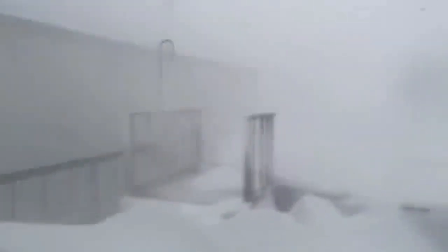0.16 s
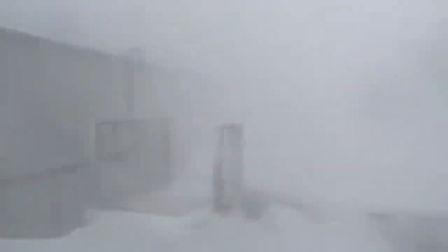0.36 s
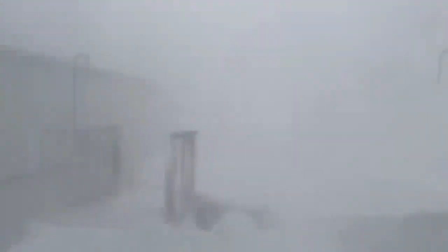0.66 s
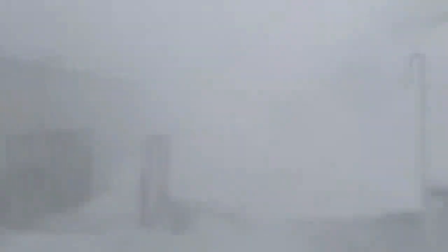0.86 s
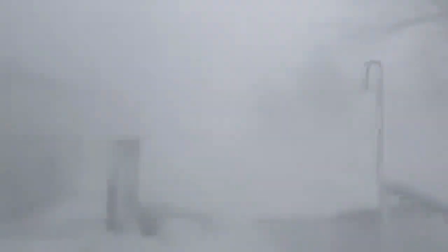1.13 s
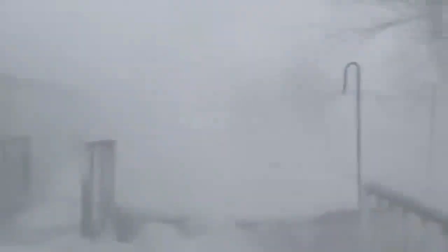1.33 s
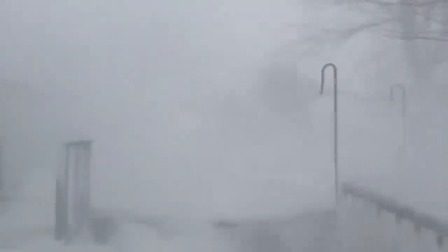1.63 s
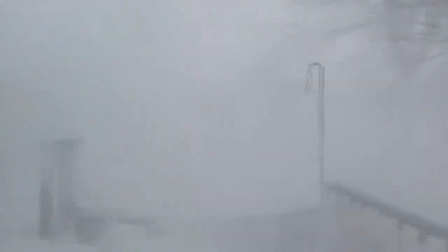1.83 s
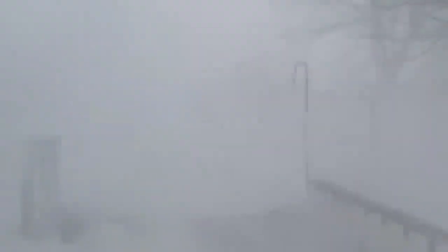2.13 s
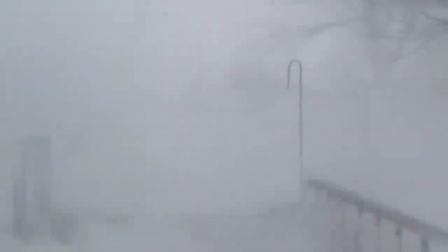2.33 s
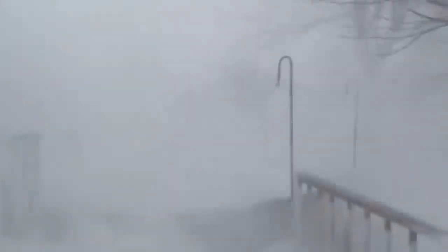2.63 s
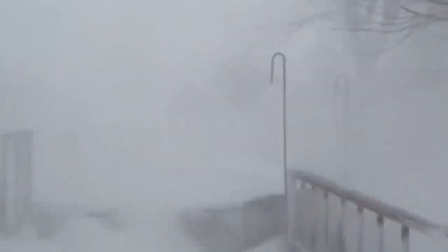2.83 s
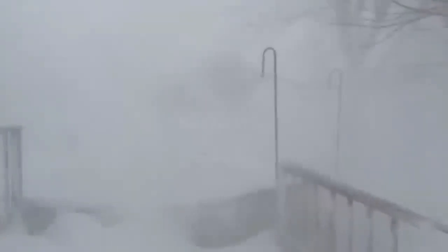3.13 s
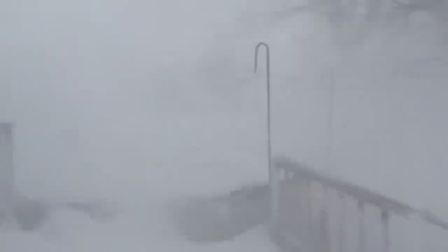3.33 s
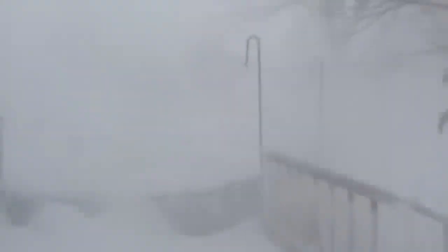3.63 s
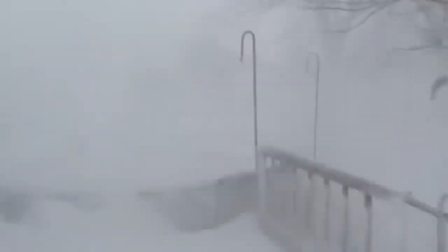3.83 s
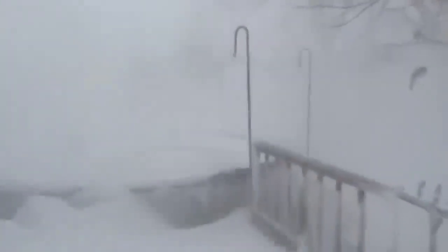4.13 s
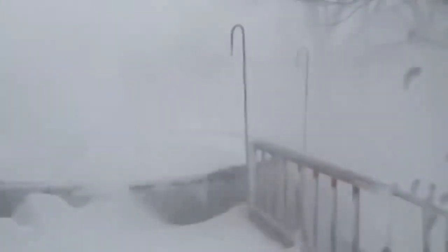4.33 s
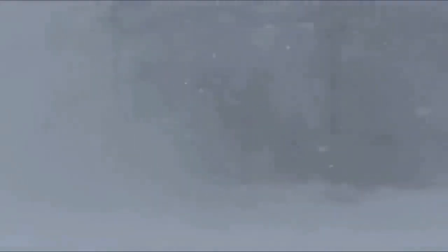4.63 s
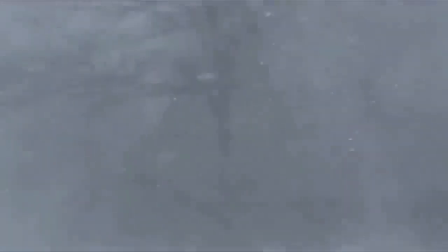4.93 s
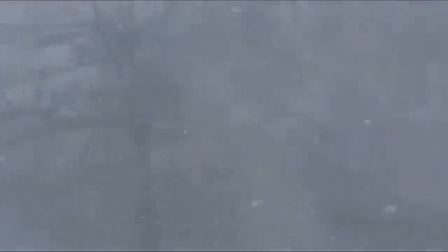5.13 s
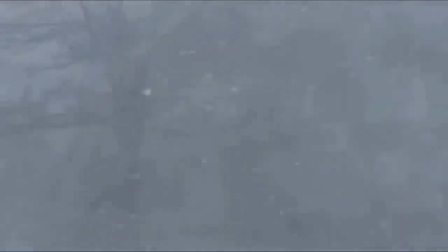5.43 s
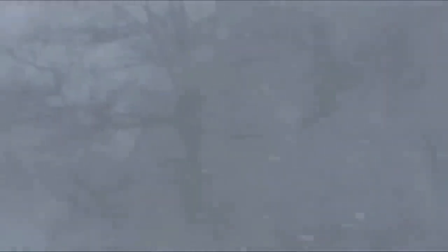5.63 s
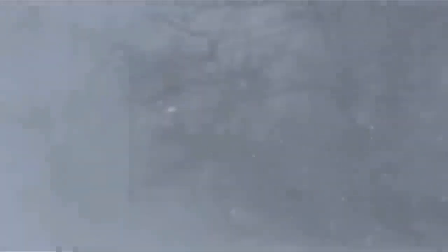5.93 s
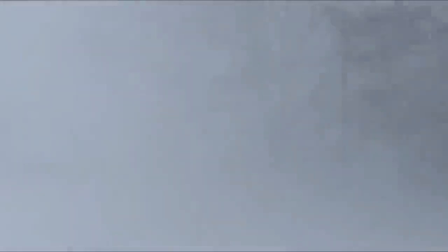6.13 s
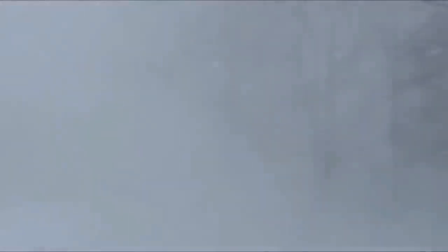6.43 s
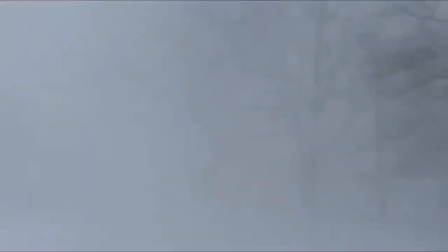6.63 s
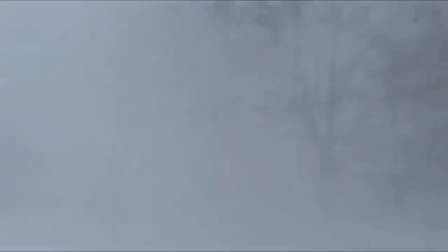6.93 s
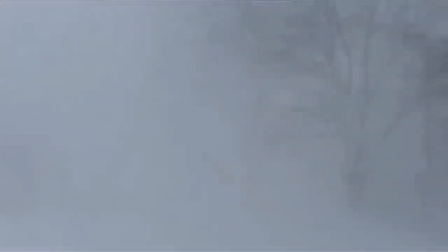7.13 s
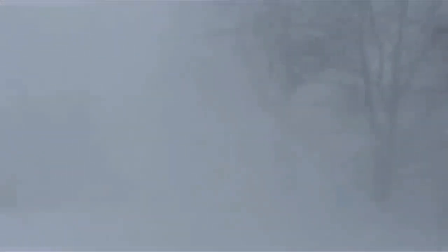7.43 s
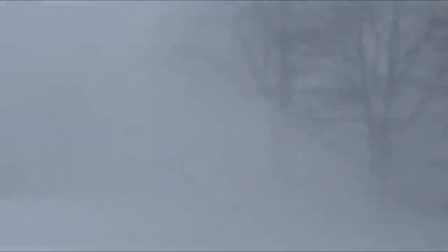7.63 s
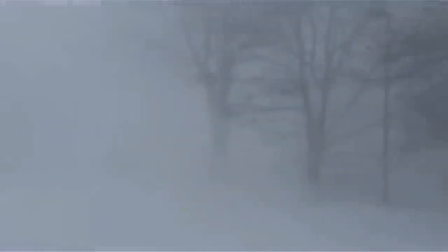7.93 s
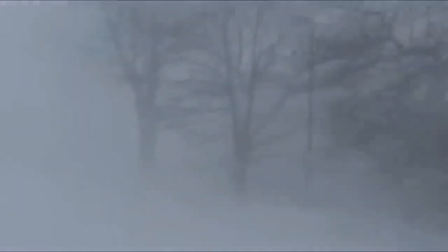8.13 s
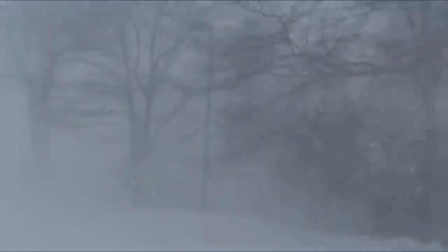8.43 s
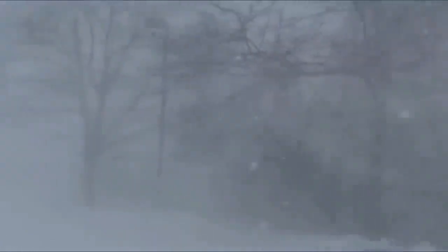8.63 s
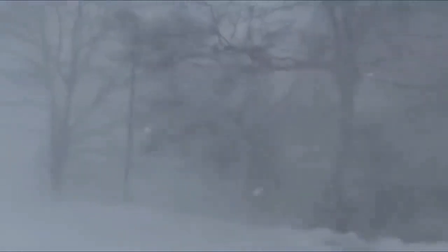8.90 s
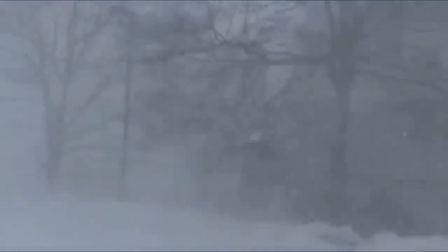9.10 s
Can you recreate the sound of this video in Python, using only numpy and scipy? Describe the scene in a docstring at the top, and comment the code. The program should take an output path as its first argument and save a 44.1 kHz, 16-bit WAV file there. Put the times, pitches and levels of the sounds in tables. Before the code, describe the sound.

Blizzard wind roars softly with light flicks on the microphone, then jumps abruptly to loud, howling gusts that buffet, slap and overload it.

```python
"""Blizzard wind over open snow, at the two microphone ports of a small handheld camera.
All round, shaped noise makes a low drone, the roar in the trees and the hiss of driven snow.
Close in, breeze and stray gusts flick the ports: noise puffs rumble, flutter, slap and rasp.
A fuzzy tone whistles once and three ticks sound on the camera body. From 4.45 s the storm is much
louder, broad bands of noise howl, and gusts buffet the ports until the recorder overloads."""
import sys
import numpy as np
from scipy import signal
from scipy.fft import rfft, irfft
from scipy.io import wavfile
from scipy.ndimage import uniform_filter1d

SR = 44100
rng = np.random.default_rng(int(sys.argv[2]) if len(sys.argv) > 2 else 0)


def materialize(psi):
    """Save the field psi as 16-bit PCM at rate SR to the path in sys.argv[1].

    A 1-D psi becomes a single channel; in a 2-D psi each row is a channel.
    """
    bounded = np.clip(np.atleast_2d(psi).T, -1, 1)
    quanta = np.round(bounded * 32767).astype(np.int16)
    wavfile.write(sys.argv[1], SR, quanta)


N = 408366

HARD_WIND_FROM_S = 4.45
TIME = np.arange(N) / SR
HZ = np.fft.rfftfreq(N, 1 / SR)
# frames of 512 samples, one every 128
FRAME_S = np.arange(N // 128 + 5) * 128 / SR
FRAME_HZ = np.fft.rfftfreq(512, 1 / SR)


def gain_of(db):
    """Decibels to amplitude."""
    return 10 ** (np.asarray(db) / 20)


def evened(x):
    """Scales to rms 1."""
    return x / np.sqrt(np.mean(x ** 2) + 1e-20)


def read(points, hz=HZ):
    """A table over frequency, joined on a log axis."""
    f, value = np.transpose(points)
    return np.interp(np.log(hz + 1), np.log(f + 1), value)


def follow(rows):
    """The columns of a table over time, at every sample."""
    s, *columns = np.transpose(rows)
    return [np.interp(TIME, s, column) for column in columns]


def wander(rate_hz):
    """Smooth chance of rms 1, with changes up to about the given rate."""
    return evened(irfft(rfft(rng.standard_normal(N)) / (1 + (HZ / rate_hz) ** 4), N))


def air(spectrum, alike):
    """Steady noise at left and right: a shared part and a part in opposite phase."""
    shared, opposed = rfft(rng.standard_normal((2, N))) * gain_of(read(spectrum))
    likeness = np.clip(read(alike), -1, 1)
    shared = shared * np.sqrt(1 + likeness)
    opposed = opposed * np.sqrt(1 - likeness)
    return evened(irfft(np.array([shared + opposed, shared - opposed]), N))


def steadied(x, seconds):
    """Keeps the quick churn of a sound but evens its strength over the given time."""
    window = signal.windows.hann(int(max(seconds, .004) * SR))
    power = signal.oaconvolve((x ** 2).mean(0), window / window.sum(), "same")
    return x / np.sqrt(np.abs(power) + 1e-6)


def storm(drone_db=0.0, roar_db=1.5, hiss_db=2.5, lumps_db=3.5, sway_db=1.43, grain_db=1.5):
    """Noise all round: a low drone, the roar in the trees, and the fine grain of driven snow."""
    # the storm before trims: t/s, drone level/dB, roar level/dB, hiss level/dB
    course = [(0, -52, -47.5, -55.5), (0.15, -39, -41, -60.5), (0.7, -36, -40, -56.5),
              (1.4, -40, -41.5, -57), (2.1, -39, -37.5, -58.5), (2.7, -34, -37.5, -56.5),
              (3.4, -35.5, -37.5, -56.5), (4.0, -35.5, -37.5, -56.5), (4.44, -32.5, -37.5, -59.5),
              (4.46, -35, -45, -39), (4.7, -20, -59, -40.5), (5.3, -45, -33, -41), (5.9, -32, -48, -41.5),
              (6.4, -35, -30.5, -43), (7.0, -31, -28.5, -46.5), (7.5, -35, -37, -49.5),
              (8.25, -39, -36.5, -49.5), (8.6, -27, -36.5, -50.5), (9.26, -32, -37, -47.5)]
    # spectra of the drone, the roar and the hiss: f/Hz, relative level/dB
    drone_spectrum = [(15, -19), (30, -58), (48, -7.5), (65, 5.5), (90, -8.5), (140, -4), (200, -12),
                      (400, -28.5), (900, -66), (3000, -82)]
    roar_spectrum = [(40, 12), (150, 7), (330, 4.5), (600, 2), (1000, -2), (1600, -10.5), (2400, -16.5),
                     (3600, -21.5), (5000, -26.5), (9000, -44.5)]
    hiss_spectrum = [(500, 9.5), (2500, 8), (4200, 2), (4900, 1), (5800, 1.5), (8500, 0.5), (10700, -3.5),
                     (11800, -21.5), (15000, -42)]
    # likeness of left and right: f/Hz, likeness/-1 to 1
    storm_alike = [(100, 1), (240, 1), (500, 0.64), (900, 0.028), (1300, 0.21), (2000, 0.97), (2800, 0.18),
                   (3900, 0.84), (4900, 0.083), (6500, 0.73), (10900, 0.063)]
    drone_level, roar_level, hiss_level = follow(course)
    drone = air(drone_spectrum, storm_alike) * gain_of(drone_db + drone_level + lumps_db * wander(8.3))
    roar = air(roar_spectrum, storm_alike) * gain_of(roar_db + roar_level + sway_db * wander(31))
    hiss = air(hiss_spectrum, storm_alike) * gain_of(hiss_db + hiss_level + grain_db * wander(540))
    return drone + roar + hiss


def blast(t, length, rise_s, fall_s):
    """Amplitude of a rush of air: a quick rise up to t = 0, a hold, a fall."""
    rise = -.5 * (np.minimum(t, 0) / rise_s) ** 2
    fall = np.maximum(t - length, 0) / fall_s
    return np.exp(rise - fall)


def wind(rise_s=0.011, fall_s=0.008):
    """Breeze and gusts add in power at the microphone: rumble dB, flutter dB and stereo width."""
    # the unsteady breeze between gusts: t/s, rumble level/dB, flutter level/dB, stereo width/0-1
    breeze = [(0, -61, -45, 1), (.15, -45, -45, 1), (.45, -40, -62, 0), (1.05, -27.5, -40, 0.54),
              (1.35, -26.5, -35.5, 0.15), (1.7, -27, -42, 0.55), (2.2, -32, -39, 0.4),
              (2.4, -67, -48, 0.06), (4.44, -80, -49.5, 0), (4.47, -20.5, -26, 0), (5.3, -25.5, -38, 0.3),
              (5.95, -25, -29.5, 1), (6.35, -30, -35, 0), (7.55, -30, -28.5, 0), (8.3, -26.5, -28.5, 0),
              (9.26, -14, -30, 1)]
    # gusts that strike the microphone:
    # start t/s, length/s, rumble level/dB, flutter level/dB, stereo width/0-1
    gusts = [(0.13, 0.055, -35.5, -43, 0.86), (0.34, 0.073, -28, -33, 0.16),
             (0.518, 0.079, -15.5, -24, 0.44), (0.898, 0.0083, -29, -48, 0.4),
             (1.139, 0.1, -17.5, -22, 0.7), (1.543, 0.048, -12.5, -23.5, 1),
             (1.737, 0.065, -16.5, -50, 0.3), (1.905, 0.037, -13.5, -36, 0), (1.964, 0.023, -16, -34, 0),
             (2.088, 0.036, -19.5, -42, 0.4), (4.53, 0.19, -23, -21, 0), (4.718, 0.2, -14, -19, 0),
             (4.967, 0.088, -12.5, -19, 0), (5.096, 0.056, -12.5, -19, 0), (5.162, 0.073, -9, -13.5, 0),
             (5.26, 0.023, -11.5, -20, 0.05), (5.382, 0.017, -18, -16.5, 0.1), (5.438, 0.13, -9, -16, 0.02),
             (5.58, 0.099, -13, -18.5, 0.9), (5.715, 0.033, -16, -21, 1), (5.794, 0.052, -9.5, -26, 1),
             (6.017, 0.077, -21, -18.5, 0.24), (6.107, 0.034, -11, -15.5, 0.83),
             (6.187, 0.046, -16.5, -22.5, 0.96), (6.444, 0.05, -22.5, -30.5, 0), (6.586, 0.024, -6, -13, 0),
             (6.655, 0.042, -7, -13, 0), (6.751, 0.081, -6.5, -10.5, 0.03), (6.835, 0.14, -3, -12.5, 0),
             (6.995, 0.032, -14, -16.5, 0), (7.045, 0.029, -1.5, -10.5, 0.02),
             (7.106, 0.015, -1, -19, 0.02), (7.164, 0.044, -11, -13, 0), (7.238, 0.041, -4, -13.5, 0),
             (7.31, 0.045, -10.5, -23.5, 0), (7.394, 0.054, -20, -17, 0.07), (7.603, 0.04, -18.5, -20.5, 0),
             (7.677, 0.069, -13, -17, 0), (7.766, 0.043, -18.5, -16, 0.02), (7.869, 0.059, -3, -13.5, 0),
             (7.963, 0.074, -12, -20.5, 0.03), (8.093, 0.069, -17.5, -23, 0.08),
             (8.35, 0.041, -15.5, -27, 0.04), (8.444, 0.071, -23, -22, 0.4), (8.63, 0.11, -20, -20.5, 0.2),
             (8.773, 0.19, -13, -17, 1), (9.005, 0.1, -11, -13, 1), (9.086, 0.16, -10.5, -12.5, 0.78)]
    rumble_db, flutter_db, width = follow(breeze)
    push, stir = gain_of(rumble_db) ** 2, gain_of(flutter_db) ** 2
    wide_stir = stir * width
    for start, length, push_db, stir_db, gust_width in gusts:
        power = blast(TIME - start, length, rise_s, fall_s) ** 2
        gust_stir = power * gain_of(stir_db) ** 2
        push = push + power * gain_of(push_db) ** 2
        stir = stir + gust_stir
        wide_stir = wide_stir + gust_stir * gust_width
    return 10 * np.log10(push), 10 * np.log10(stir), wide_stir / stir


def rumble(db, level_db=0., hold_s=0.064, lumps_db=3.0):
    """Deep thumps of wind: the recorder folds them to mono in hard wind, less so in light wind."""
    # spectrum of the rumble: f/Hz, relative level/dB
    rumble_spectrum = [(12, -34), (25, -58), (45, 1), (78, 2.5), (120, -3.5), (190, -5.5), (270, -12.5),
                       (450, -26), (1200, -59), (4000, -100)]
    light = air(rumble_spectrum, [(60, 1.0), (130, 0.87), (300, 0.14)])
    hard = air(rumble_spectrum, [(60, 1), (300, 1)])
    push = np.where(TIME < HARD_WIND_FROM_S, light, hard)
    return steadied(push * gain_of(lumps_db * wander(28.4)), hold_s) * gain_of(level_db + db)


def edge_of(db, edge_hz=990, at_db=-23.5, db_per_octave=15):
    """Faster air is louder and brighter: the upper edge of the flutter in Hz at a given level."""
    return edge_hz * 2 ** ((db - at_db) / db_per_octave)


def eddy_colour(hz, edge_hz, steepness=2.98):
    """Spectrum of small eddies, which die out above the given edge."""
    # spectrum of the flutter: f/Hz, relative level/dB
    flutter_spectrum = [(60, -14), (170, -4.5), (260, 3), (450, 0.5), (800, -8), (1600, -19.5),
                        (3200, -25.5), (5000, -28.5), (7000, -21.5), (15000, -30)]
    colour = gain_of(read(flutter_spectrum, hz)) / np.sqrt(1 + (hz / edge_hz) ** (2 * steepness))
    return colour / np.linalg.norm(colour, axis=0)


def left_right(shared, opposed, s, hz, width, opposed_db=0.5):
    """Left and right spectra at time s: stereo width sets the share in opposite phase."""
    # share in opposite phase at left and right at full stereo width, light wind: f/Hz, share/0-1
    light_wind_opposed = [(60, .03), (130, 0.3), (220, 0.5), (450, 1), (800, 1), (1400, 0.67), (2000, 0.2),
                          (6000, 0.8)]
    # the same share once the wind blows hard: f/Hz, share/0-1
    hard_wind_opposed = [(300, 0.002), (420, 0.01), (530, 0), (680, 1), (1200, 1), (2000, 0.87), (2800, 1),
                         (3800, 0), (5000, 0.7), (7000, 1)]
    most = np.where(s < HARD_WIND_FROM_S, read(light_wind_opposed, hz), read(hard_wind_opposed, hz))
    share = np.clip(most * width, 0, 1)
    shared = shared * np.sqrt(1 - share)
    opposed = opposed * np.sqrt(share) * gain_of(opposed_db)
    return np.array([shared + opposed, shared - opposed])


def at_frames(control):
    """A control read once a frame."""
    return np.interp(FRAME_S, TIME, control)


def port_air(colour, width, patchy_db):
    """Turbulence on the ports: a colour (Hz by frame) broken into short-lived patches."""
    a, b, c, d, patches = rng.standard_normal((len(FRAME_S), len(FRAME_HZ), 5)).T
    patches = uniform_filter1d(patches, size=6, axis=0)
    patches = evened(uniform_filter1d(patches, size=6, axis=1))
    sides = left_right(a + 1j * b, c + 1j * d, FRAME_S, FRAME_HZ[:, None], at_frames(width))
    spectra = colour * gain_of(patchy_db * patches) * sides
    return evened(signal.istft(spectra, nperseg=512, noverlap=384)[1][:, :N])


def flutter(db, width, level_db=0., churn_db=6.0, churn_hz=55, edge_octaves=0.28):
    """Smaller eddies come in bursts: one churn of the flow drives both loudness and brightness."""
    churn = wander(churn_hz)
    edge_hz = at_frames(edge_of(db) * 2 ** (edge_octaves * churn))
    flow = port_air(eddy_colour(FRAME_HZ[:, None], edge_hz), width, patchy_db=0.0)
    churned = steadied(flow, 0.098) * gain_of(churn_db * churn)
    return steadied(churned, 0.037) * gain_of(level_db + db)


def stray_eddies(flutter_db, above_db=-7.0, spread_db=0.0, length_s=0.0033, low_hz=200, count=90):
    """Lesser slaps, one at random in each equal stretch of time, that follow the flutter level."""
    times = (np.arange(count) + rng.random(count)) / count * (N / SR - .2) + .1
    levels = np.interp(times, TIME, flutter_db) + above_db + spread_db * rng.standard_normal(count)
    return [(s, length_s, db, low_hz, edge_of(db)) for s, db in zip(times, levels)]


def swell(t, length, rise, fall):
    """Amplitude of one puff that comes and goes around t = 0."""
    return np.exp(-.5 * (t / max(length, .002) / np.where(t < 0, rise, fall)) ** 2)


def slaps(eddies, width, level_db=0.5, snap_db=1.5, snap_cycles=0.24):
    """Single eddies hit the ports: a few ms of violent flutter around one sharp swing of pressure."""
    out, size = np.zeros((2, N)), 4096
    t, hz = (np.arange(size) - size // 2) / SR, np.fft.rfftfreq(size, 1 / SR)
    for s, length, db, low_hz, edge_hz in eddies:
        colour = eddy_colour(hz, edge_hz) / np.sqrt(1 + (low_hz / (hz + 1)) ** 4)
        shared, opposed = rfft(rng.standard_normal((2, size))) * colour
        flow = evened(irfft(left_right(shared, opposed, s, hz, width[int(s * SR)])))
        # the swing is quicker where the upper edge is higher, and may go either way
        u = t * edge_hz / snap_cycles / 2
        snap = rng.choice([-1, 1]) * gain_of(snap_db) * 2 * u / (1 + u ** 2) ** 2
        puff = swell(t, length, rise=0.52, fall=0.58)
        slap = evened((flow + snap) * puff) * np.sqrt(np.mean(puff ** 2))
        start = int(s * SR) - size // 2
        out[:, start:start + size] += gain_of(level_db + db) * slap
    return out


def rasps(level_db=0.0, grit_db=2.0, grit_hz=330, uneven_db=4.0, uneven_hz=230, steepness=4.7,
          rise_s=0.0047, fall_s=0.0071, spurt_db=3.0, spurt_hz=90):
    """Thin jets tear at the rim of a port in gritty spurts, each with its own random uneven colour."""
    # jets over the rim: start t/s, length/s, level/dB, upper edge f/Hz, stereo width/0-1
    jets = [(0.348, 0.022, -42, 1880, 0), (0.523, 0.005, -25.5, 3250, 0.2), (0.541, 0.022, -28, 3860, 0.35),
            (0.574, 0.01, -30, 2940, 0.3), (1.153, 0.018, -29, 2780, 0.55), (1.182, 0.0097, -29, 2800, 0.6),
            (1.226, 0.0093, -38.5, 3400, 0.2), (4.672, 0.023, -28.5, 2100, 0), (4.89, 0.05, -26, 2300, 0.7),
            (4.978, 0.048, -22.5, 2600, 0.01), (5.071, 0.016, -21.5, 2480, 0), (5.096, 0.032, -18, 2650, 0),
            (5.158, 0.067, -19.5, 2570, 0), (5.635, 0.028, -28, 1290, 0.88),
            (5.801, 0.028, -23, 1600, 0.94), (6.026, 0.056, -37, 1900, 0.56),
            (6.094, 0.041, -26, 1700, 0.85), (6.812, 0.041, -25.5, 3400, 0.2),
            (6.871, 0.087, -24.5, 3080, 0), (7.041, 0.043, -26, 3800, 0), (7.179, 0.014, -26, 3400, 0),
            (7.244, 0.015, -27, 3570, 0.02), (7.864, 0.034, -20, 4040, 0.02),
            (8.644, 0.069, -34, 3070, 0.01), (8.73, 0.071, -34, 3420, 0.9), (8.791, 0.041, -21, 4620, 0.58),
            (8.845, 0.011, -21.5, 4850, 0.02), (8.878, 0.016, -32, 4200, 0.1),
            (8.906, 0.02, -21.5, 3340, 0), (8.949, 0.03, -19.5, 4600, 0.97),
            (8.991, 0.028, -17.5, 4300, 0.73), (9.044, 0.018, -24, 4000, 0.95),
            (9.075, 0.021, -15.5, 4200, 0.5), (9.106, 0.014, -20, 4800, 0.77),
            (9.123, 0.031, -17.5, 4580, 0.07), (9.169, 0.013, -17.5, 5330, 0.38),
            (9.195, 0.021, -19, 4600, 0.98), (9.24, 0.025, -26, 4200, 0.9)]
    # spectrum of a jet: f/Hz, relative level/dB
    rasp_spectrum = [(300, -23), (600, 2), (1100, 4), (2200, 0.5), (3000, -3), (4700, -4), (5400, -15),
                     (7000, -17.5), (11000, -2.5), (15000, -12)]
    size, lead = 12288, 1024
    out = np.zeros((2, N + size))
    t, hz = (np.arange(size) - lead) / SR, np.fft.rfftfreq(size, 1 / SR)
    grit = gain_of(grit_db * wander(grit_hz) + spurt_db * wander(spurt_hz))
    for start, length, db, edge_hz, width in jets:
        rows = rng.standard_normal((2, 100))
        uneven = np.array([np.interp(hz / uneven_hz, np.arange(len(row)), row) for row in rows])
        colour = gain_of(read(rasp_spectrum, hz) + uneven_db * uneven)
        colour = colour / np.sqrt(1 + (hz / edge_hz) ** (2 * steepness))
        shared, opposed = irfft(rfft(rng.standard_normal((2, size))) * colour)
        share, at = np.clip(width, 0, 1), int(start * SR) - lead
        shared = evened(shared) * np.sqrt(1 - share)
        opposed = evened(opposed) * np.sqrt(share)
        jet = np.array([shared + opposed, shared - opposed]) * np.resize(grit[at:at + size], size)
        rush = blast(t, length, rise_s, fall_s)
        out[:, at:at + size] += gain_of(level_db + db) * steadied(jet, 0.043) * rush
    return out[:, :N]


def ticks(decay_s=0.0024):
    """Dry, broad clicks on the camera body: decaying noise through a wide band, almost no ring."""
    # the ticks: t/s, peak level/dB, centre f/Hz, bandwidth/octaves
    clicks = [(1.037, -25.5, 1700, 1), (2.209, -32, 8050, 0.28), (4.381, -36.5, 3300, 0.89)]
    out = np.zeros(N)
    for s, db, hz, octaves in clicks:
        burst = rng.standard_normal(N) * (TIME >= s) * np.exp(-abs(TIME - s) / decay_s)
        band = 1 / (1 + (np.log2((HZ + 1) / hz) / octaves) ** 2)
        click = irfft(rfft(burst) * band, N)
        out += gain_of(db) * click / abs(click).max()
    return out


def whistle(width_hz=62, level_db=1.0):
    """Vortices shed by something thin: a fuzzy tone that rises and falls in pitch and level."""
    # the whistle before the level trim: t/s, f/Hz, level/dB
    pitch_course = [(2.38, 1380, -59), (2.46, 1530, -52), (2.6, 1620, -49), (2.69, 1640, -50),
                    (2.745, 1390, -49), (2.79, 1370, -46), (2.84, 1330, -68)]
    hz, db = follow(pitch_course)
    turn = np.exp(2j * np.pi * np.cumsum(hz) / SR)
    fuzz = wander(width_hz) + 1j * wander(width_hz)
    tone = steadied((turn * fuzz).real[None], 0.046)
    blowing = (TIME > pitch_course[0][0]) & (TIME < pitch_course[-1][0])
    return blowing * gain_of(db + level_db) * tone


def howl(level_db=0., octaves=0.72, churn_db=3.0, churn_hz=70):
    """Sustained gusts over the ports gather their noise in one broad, moving band."""
    # surges, the first climbing as it gathers speed: t/s, centre f/Hz, level/dB, stereo width/0-1
    surges = [(4.45, 614, -36, 0), (4.55, 690, -26.5, 0.04), (4.65, 744, -21.5, .3), (4.68, 970, -25, 0.2),
              (4.73, 820, -19.5, 0.25), (4.77, 885, -22, 0.3), (4.86, 754, -18.5, 0.4),
              (4.9, 990, -19, 0.4), (4.95, 945, -22, 0), (5.0, 1050, -19, 0.1), (5.05, 1080, -23, 0.05),
              (5.105, 1150, -19, 0.3), (5.145, 1100, -21, 0.5), (5.215, 1050, -17, 0),
              (5.255, 900, -53, 0.1), (5.56, 800, -44, 0.7), (5.61, 895, -29, 1), (5.74, 885, -31.5, 0.82),
              (5.86, 930, -32, 1), (5.92, 810, -38, 0.54), (6.11, 855, -32, 1), (6.29, 800, -35, 1),
              (6.38, 800, -62, 1), (8.7, 900, -60, 0.8), (8.78, 1000, -24, 1), (8.86, 1000, -33, 1),
              (8.92, 1100, -22, 0.5), (8.95, 1130, -34, 0.95), (9.03, 1000, -29, 0.93), (9.09, 990, -22, 1),
              (9.26, 895, -17.5, 0.95)]
    hz, db, width = follow(surges)
    colour = 1 / (1 + (np.log2((FRAME_HZ[:, None] + 1) / at_frames(hz)) / octaves) ** 4)
    churned = port_air(colour, width, patchy_db=3.5) * gain_of(churn_db * wander(churn_hz))
    blowing = (TIME > surges[0][0]) * (TIME < surges[-1][0])
    return blowing * gain_of(level_db + db) * steadied(churned, 0.045)


def narrowed(x, corner_hz=440, side_db=0.0):
    """In the hard wind the bass is the same at both ears; only the range above it stays wide."""
    mid, side = x.mean(0), (x[0] - x[1]) / 2
    high_pass = 1 - 1 / (1 + (HZ / corner_hz) ** 8)
    wide = irfft(rfft(side) * high_pass, N) * gain_of(side_db)
    side = np.where(TIME < HARD_WIND_FROM_S, side, wide)
    return np.array([mid + side, mid - side])


def scene():
    """The storm all round, with the wind on the microphone in front of it."""
    # the hardest single eddies, before the level trim:
    # peak t/s, length/s, level/dB, lower edge f/Hz, upper edge f/Hz
    hard_eddies = [(.175, 0.016, -26, 140, 200), (.282, 0.003, -25, 150, 750),
                   (.353, 0.0086, -21.5, 300, 1500), (.361, 0.0035, -25, 450, 1600),
                   (.371, .002, -24, 700, 1600), (.386, 0.0031, -23.5, 180, 500),
                   (.395, 0.0036, -28, 400, 1200), (.413, 0.0048, -20, 150, 500),
                   (.528, 0.0061, -13, 350, 2620), (.553, 0.0045, -22, 300, 4500),
                   (.564, 0.0051, -24, 900, 4800), (.571, .008, -15, 140, 330),
                   (.577, 0.0036, -19.5, 1500, 2270), (.615, 0.0097, -16, 150, 570),
                   (.681, 0.0098, -25, 150, 650), (.753, 0.0091, -25.5, 300, 1100),
                   (.825, 0.0079, -28.5, 200, 447), (.906, 0.0062, -18.5, 200, 1130),
                   (.979, 0.0088, -22, 150, 820), (1.122, 0.0088, -22, 130, 500),
                   (1.16, 0.0092, -20.5, 890, 2240), (1.189, 0.0055, -26, 1000, 1900),
                   (1.211, 0.0065, -21, 90, 200), (1.221, 0.0036, -22, 400, 1400),
                   (1.227, .005, -13.5, 150, 400), (1.234, 0.0048, -15.5, 300, 1300),
                   (1.332, 0.0061, -18, 110, 300), (1.347, 0.0052, -12, 130, 774),
                   (1.384, 0.0047, -18, 150, 530), (1.488, 0.0065, -22, 200, 800),
                   (1.502, 0.004, -12.5, 300, 1290), (1.51, 0.0043, -17.5, 400, 1500),
                   (1.589, 0.013, -14.5, 120, 1090), (1.77, 0.014, -15, 170, 276),
                   (1.918, 0.011, -15, 150, 283), (1.925, 0.012, -22, 500, 1100),
                   (1.934, 0.006, -11, 200, 400), (1.938, 0.004, -17, 1200, 1640),
                   (1.978, 0.0061, -23, 200, 397), (4.54, 0.0086, -12.5, 200, 800),
                   (4.56, .006, -17, 400, 900), (4.596, 0.0026, -10.5, 500, 1200),
                   (4.609, 0.0021, -15, 600, 1500), (4.667, 0.0031, -10.5, 400, 1450),
                   (4.678, .004, -15, 500, 1500), (4.731, 0.0043, -16, 500, 1200),
                   (4.759, 0.0067, -10, 510, 1300), (4.771, 0.0036, -12, 400, 1100),
                   (4.872, 0.0031, -14, 400, 1200), (4.902, .004, -16, 600, 1700),
                   (4.985, 0.0062, -13, 400, 1700), (5.103, 0.0078, -23, 1000, 2000),
                   (5.162, 0.005, -17, 400, 1500), (5.181, 0.005, -9.5, 350, 1800),
                   (5.208, 0.011, -7, 300, 1900), (5.221, 0.017, -8, 350, 2260),
                   (5.382, 0.0036, -14, 400, 980), (5.4455, 0.002, -1, 1330, 2920),
                   (5.462, 0.0019, -2.5, 1200, 1860), (5.468, 0.0072, -11, 900, 1790),
                   (5.539, 0.0027, -0.5, 670, 3600), (5.555, 0.0077, -7.5, 1210, 2830),
                   (5.559, 0.013, -7, 500, 2430), (6.112, 0.01, -12.5, 150, 1100),
                   (6.197, 0.009, -10.5, 150, 840), (6.323, 0.0041, -21.5, 150, 530),
                   (6.439, 0.0045, -15, 280, 850), (6.578, 0.0022, -7.5, 300, 1660),
                   (6.663, 0.0017, 0.5, 500, 2160), (6.676, 0.006, -13, 300, 1000),
                   (6.746, 0.0025, -7, 500, 2100), (6.752, 0.0015, -3, 600, 2000),
                   (6.77, 0.0035, -6, 450, 1310), (6.79, 0.0025, -9, 450, 1500),
                   (6.823, 0.0048, -6.5, 400, 1710), (6.837, .002, -13, 500, 2000),
                   (6.849, 0.004, -8, 397, 1700), (6.871, 0.0044, -1.5, 400, 1800),
                   (6.88, .003, -12, 500, 1700), (6.891, 0.0034, -4, 500, 2000),
                   (6.906, 0.0034, -5, 397, 2200), (6.913, 0.0025, -17, 500, 1790),
                   (6.93, 0.0052, -5.5, 500, 1600), (6.947, 0.0026, -9, 400, 1900),
                   (6.957, 0.0021, -15, 400, 1700), (6.97, 0.0021, -15, 600, 1600),
                   (7.0, 0.0058, -13, 600, 1700), (7.022, 0.0032, -7, 400, 1610),
                   (7.053, 0.0023, -6.5, 600, 2150), (7.066, 0.0045, -6, 695, 2380),
                   (7.103, 0.005, -4, 450, 1690), (7.153, 0.0033, -19, 600, 2200),
                   (7.174, 0.0034, -1.5, 500, 1900), (7.19, 0.0032, -18, 300, 2000),
                   (7.208, .003, -13, 400, 1300), (7.236, 0.0048, -8.5, 550, 1780),
                   (7.253, 0.0066, -6, 400, 2210), (7.263, 0.0016, -11, 494, 2000),
                   (7.282, 0.0078, -7, 450, 1330), (7.33, 0.011, -12.5, 300, 1180),
                   (7.365, 0.0056, -9.5, 250, 950), (7.412, .004, -15, 600, 1360),
                   (7.717, 0.0078, -5, 345, 1320), (7.766, 0.0023, -10.5, 450, 1500),
                   (7.786, 0.0046, -14, 450, 1400), (7.796, 0.0026, -15, 500, 1500),
                   (7.85, 0.0081, -12, 200, 1100), (7.869, 0.0023, -7, 500, 2210),
                   (7.877, 0.0033, -3, 493.4, 2010), (7.897, 0.0045, -12, 450, 2420),
                   (7.973, 0.0051, -7, 300, 1200), (7.987, 0.0086, -12.5, 300, 1410),
                   (8.016, 0.0043, -10.5, 400, 1310), (8.073, 0.0067, -14, 200, 1110),
                   (8.088, 0.0039, -9.5, 350, 800), (8.107, 0.0037, -9.5, 400, 1170),
                   (8.118, 0.0046, -8, 300, 1180), (8.165, 0.0062, -8, 200, 645),
                   (8.344, 0.0036, -11.5, 300, 1820), (8.367, 0.0066, -8, 150, 745),
                   (8.494, 0.0056, -12.5, 200, 910), (8.643, 0.0046, -17, 300, 1320),
                   (8.865, 0.005, -12.5, 250, 3800), (8.762, 0.0064, -15.5, 400, 850),
                   (8.9, 0.007, -17, 605, 1310), (8.925, 0.0082, -11, 900, 1600),
                   (9.21, 0.018, -13, 500, 1200)]
    rumble_db, flutter_db, width = wind()
    outdoors = storm() + whistle()
    buffeting = rumble(rumble_db) + flutter(flutter_db, width) + howl() + rasps()
    slapping = slaps(hard_eddies + stray_eddies(flutter_db), width)
    return narrowed(outdoors + buffeting + ticks() + slapping)


def record(dry, drive_db=-0.01, knee=10, edge_hz=15500):
    """The loudest pushes flatten against full scale; then a low-pass sets the band limit."""
    driven = dry * gain_of(drive_db)
    clipped = driven / (1 + abs(driven) ** knee) ** (1 / knee)
    low_pass = signal.firwin(511, edge_hz, window=("kaiser", 9), fs=SR)
    return signal.oaconvolve(clipped, low_pass[None], "same")


dry = scene()
out = record(dry)
materialize(out)
```